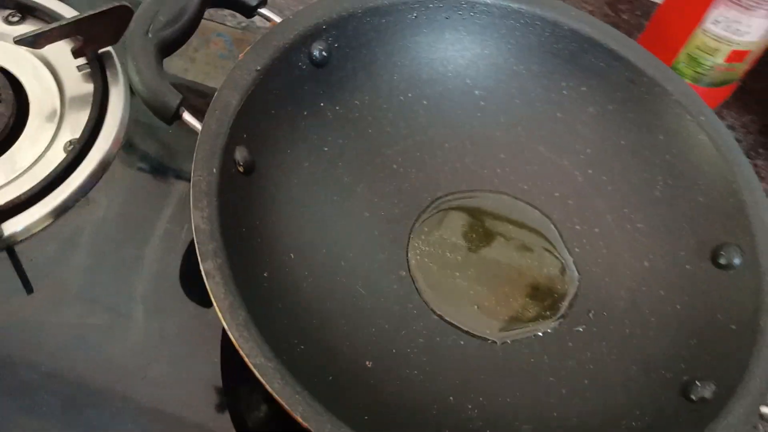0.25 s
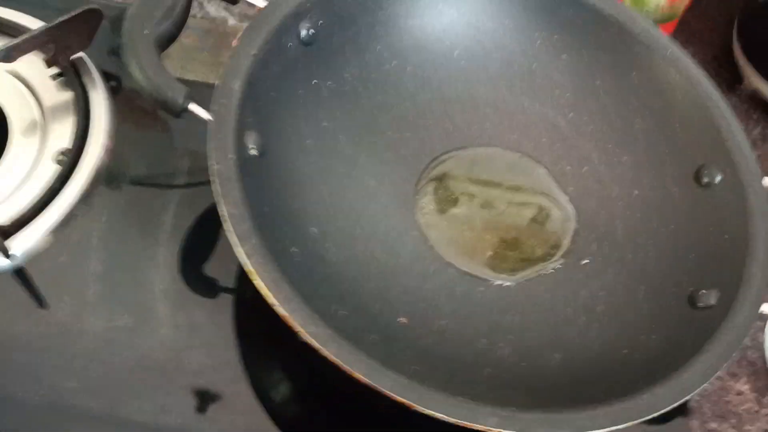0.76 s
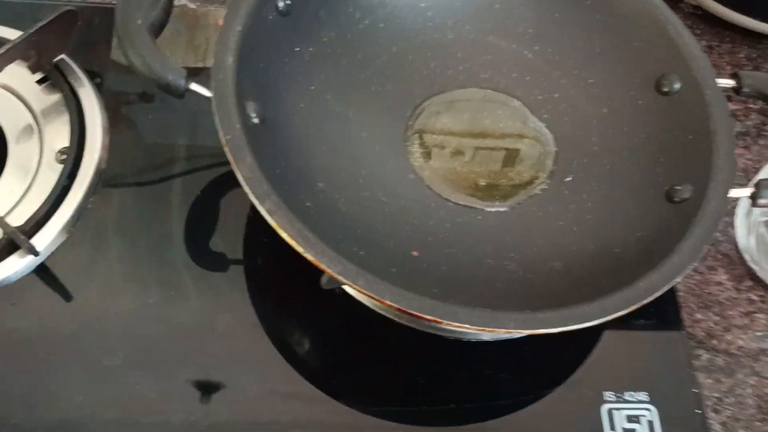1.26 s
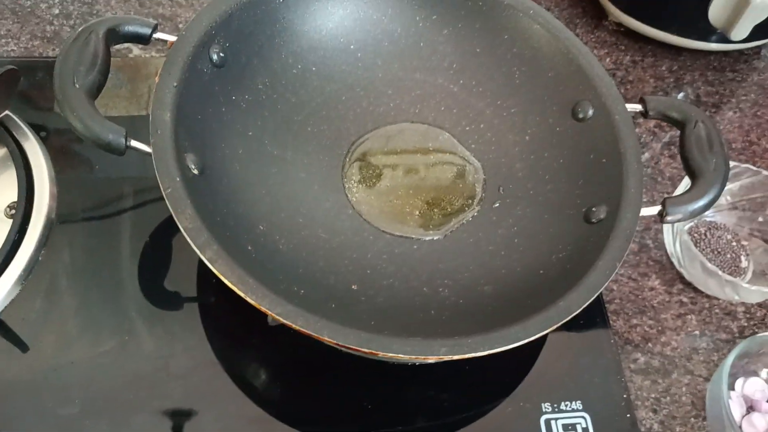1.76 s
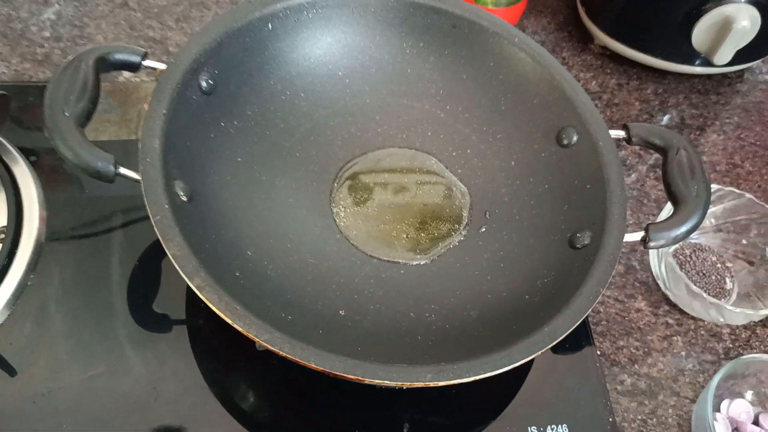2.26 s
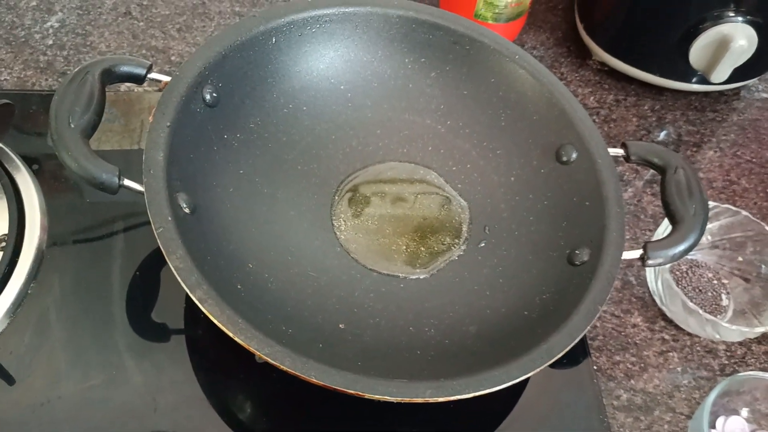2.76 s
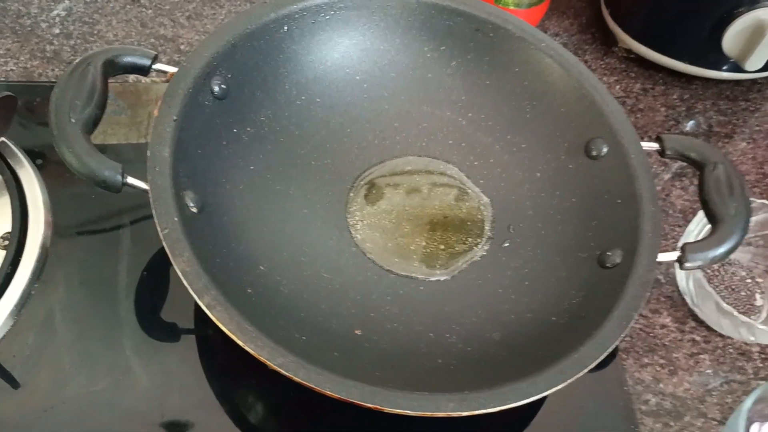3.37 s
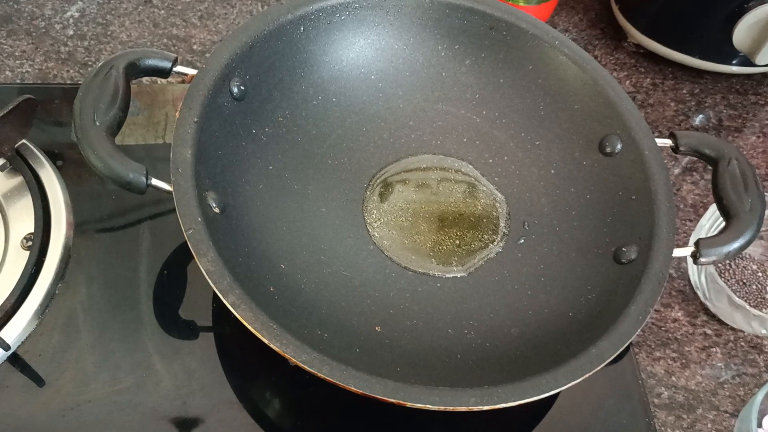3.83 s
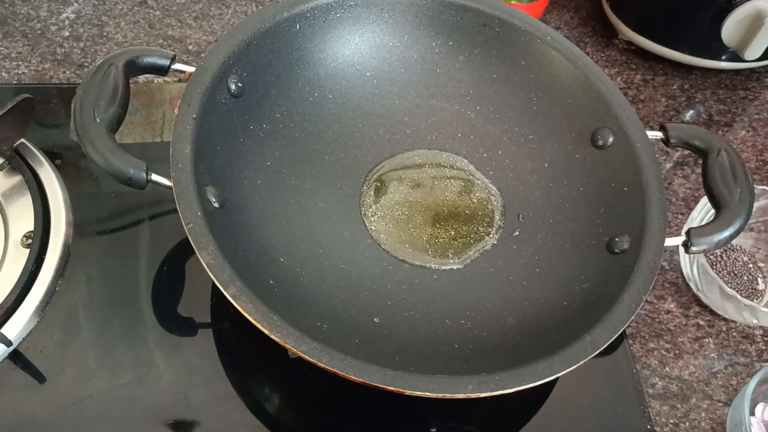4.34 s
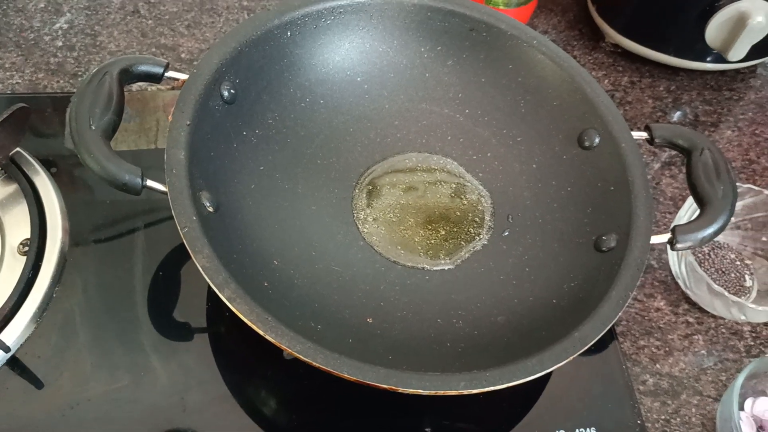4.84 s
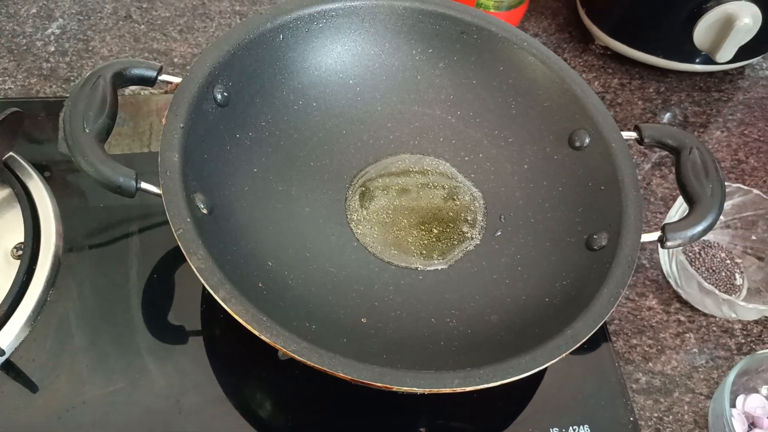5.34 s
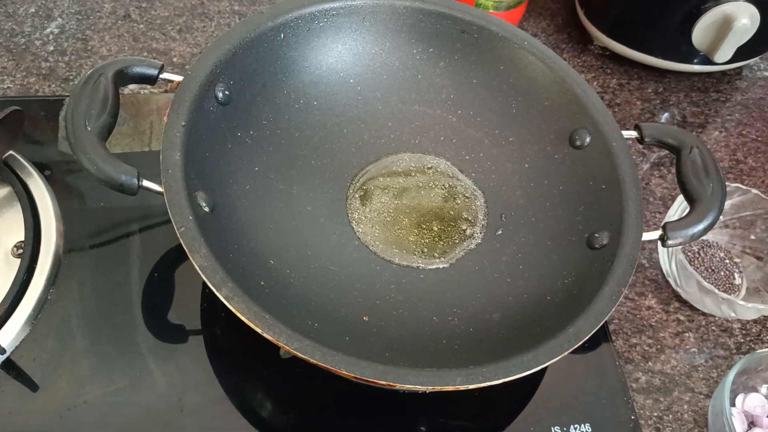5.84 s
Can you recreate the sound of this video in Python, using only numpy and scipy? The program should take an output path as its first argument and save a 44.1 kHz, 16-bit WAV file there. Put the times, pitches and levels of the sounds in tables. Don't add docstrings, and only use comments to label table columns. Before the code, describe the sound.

Close to a pan of heating oil, small bright pops and clicks burst irregularly over a soft steady gas hiss. Around half a second a hand rubs the phone with a knock and low thud. Pops stay sparse for a while, then thicken after four seconds into busy crackling, with louder bursts near the end. A small kitchen adds short echoes, and faint horns sound far away.

```python
import sys
import numpy as np
from scipy import signal
from scipy.fft import rfft, irfft, next_fast_len
from scipy.io import wavfile
from scipy.ndimage import uniform_filter1d, minimum_filter1d, map_coordinates

SR = 44100
rng = np.random.default_rng(int(sys.argv[2]) if len(sys.argv) > 2 else 0)


def persist_wave(psi):
    counts = np.round(np.clip(psi, -1, 1) * 32767).astype(np.int16)
    wavfile.write(sys.argv[1], SR, np.atleast_2d(counts).T)


def rack_gain(trim_db):
    fader = np.asarray(trim_db, float)
    return 10 ** (fader / 20)


N = 269010

# frequency in Hz, left-right likeness from -1 to 1.
LIKENESS = [(60, 0.67), (180, 0.77), (550, 0.59), (1650, -0.54), (4970, 0.3), (15000, 0.22)]


def unit(x):
    return x / np.sqrt(np.mean(x ** 2) + 1e-20)


def along(points, hz):
    f, v = np.transpose(points)
    return np.interp(np.log(hz + 1), np.log(f + 1), v)


def wobble(rate):
    knots = rng.standard_normal(int(N * rate / SR) + 4)
    return map_coordinates(knots, [np.arange(N) * rate / SR])


def filtered(x, response):
    m = next_fast_len(N + SR // 2)
    return irfft(rfft(x, m) * response(np.fft.rfftfreq(m, 1 / SR)), m)[..., :N]


def causal(points, size=1024):
    cepstrum = irfft(np.log(rack_gain(along(points, np.fft.rfftfreq(size, 1 / SR))) + 1e-6))
    fold = np.r_[1, 2 * np.ones(size // 2 - 1), 1, np.zeros(size // 2 - 1)]
    return irfft(np.exp(rfft(cepstrum * fold)))


def rush(spectrum, alike, patchy_db):
    z = signal.stft(rng.standard_normal((2, N)), nperseg=512)[2]
    field = uniform_filter1d(rng.standard_normal(z.shape[1:]), size=6, axis=0)
    field = uniform_filter1d(field, size=12, axis=1)
    pair = signal.istft(z * rack_gain(patchy_db * unit(field)), nperseg=512)[1][:, :N]

    def response(hz):
        angle = np.arccos(np.clip(along(alike, hz), -1, 1)) / 2
        return rack_gain(along(spectrum, hz)) * [np.cos(angle), np.sin(angle)]

    mid, side = filtered(pair, response)
    return unit(np.array([mid + side, mid - side]))


def flame():
    # time in seconds, level in dB.
    jet = [(0, -51.5), (2.5, -52), (4.1, -50), (6.1, -54)]
    # frequency in Hz, density in dB per Hz.
    hiss = [(530, -60), (900, -15), (1120, -11.5), (1160, -10.5), (1460, -12.5), (1900, -5), (2020, -6),
            (4360, -2.5), (5960, -10.5), (15100, -39), (16000, -27)]
    hiss_db = np.interp(np.arange(N) / SR, *np.transpose(jet))
    return rack_gain(hiss_db - 11.0 + 1.3 * wobble(4.22)) * rush(hiss, LIKENESS, patchy_db=2.0)


def house():
    # frequency in Hz, density in dB per Hz.
    murmur = [(12, -15), (36, -2), (60, -8.5), (140, -9), (176, -14.5), (213, -15.5), (322, -13.5),
              (750, -18), (860, -19.5), (1600, -17.5), (3000, -100)]
    # start in seconds, length in seconds, pitch in Hz, level in dB.
    horns = [
        (2.46, 0.097, 729, -76),
        (2.577, 0.29, 1496, -77),
        (3.435, 0.18, 721, -76.5),
        (3.581, 0.16, 1396, -77),
        (4.23, 0.18, 1200, -76),
    ]
    t = np.arange(N) / SR
    tones = np.zeros(N)
    for start, length, hz, db in horns:
        swell = np.sin(np.pi * np.clip((t - start) / length, 0, 1)) ** .6
        tones += rack_gain(db + 3.5) * swell * np.sin(2 * np.pi * hz * t + 1.5 * wobble(30))
    return rack_gain(-67.5) * rush(murmur, LIKENESS, patchy_db=1.0) + tones


def ringing(hz, cycles, rise, t):
    swell = 1 - np.exp(-t * hz / rise)
    decay = rack_gain(-60 * (t * hz / cycles) ** 2.02)
    ring = swell * decay * np.sin(2 * np.pi * hz * t * (1 + 12 * t))
    return ring / np.abs(ring).max(axis=1, keepdims=True)


def patter(s, length, db, hz, count, octaves):
    draw = rng.random((count, 4))
    start = s + length * draw[:, 0]
    size_db = db + np.minimum(-4 * np.log(draw[:, 1]), 6.5)
    hz = hz * 2 ** (octaves * (draw[:, 2] - .5))
    snap_db = size_db - 20 - 14 * draw[:, 3]
    return np.c_[start, size_db, hz, size_db - 8, 1.5 * hz, snap_db]


def pops():
    # start in seconds, cavity level in dB, cavity pitch in Hz, neck level in dB, neck pitch in Hz.
    deep = [(0.9554, -30.0, 2900, -32.5, 3660.0), (1.3148, -31, 3700, -56, 4900),
            (1.4058, -25, 3460, -32.0, 4800), (1.5851, -33, 3170, -44.5, 2350.0),
            (1.6067, -35.5, 2770, -41, 3900.0), (1.7974, -33.5, 2760, -35.5, 3620),
            (1.9113, -41, 2800, -47, 5250), (2.8601, -30.5, 2510, -44, 3600.0),
            (3.1626, -37, 2650, -36, 5200), (3.285, -34, 4220.0, -47, 2450.0),
            (3.5164, -26, 3850, -32, 2780), (3.6941, -30.5, 3800, -43.5, 2800),
            (3.8485, -33.5, 3000, -36.0, 3800), (3.9964, -42, 2340, -42, 3500),
            (4.1679, -35, 3000, -48, 4760.0), (4.2923, -27.0, 3740, -30.5, 5170),
            (4.3802, -22.5, 2395, -25, 3690.0), (4.5268, -32, 2690, -45, 3740.0),
            (4.5421, -34, 4660, -45, 2600), (4.6805, -32, 2310, -38.5, 3070.0),
            (4.775, -37, 3250.0, -46, 4670), (4.8802, -26.5, 2740, -41, 4000),
            (4.9289, -38, 4850.0, -44.0, 2900), (4.9454, -32.5, 2940.0, -33.5, 2330),
            (5.0351, -29.5, 2760, -36.5, 4580), (5.1641, -24.5, 4560, -30.5, 2800),
            (5.1852, -27.5, 2710.0, -44, 3760.0), (5.4597, -27.5, 2590, -38, 3800.0),
            (5.5377, -26, 2274, -37.0, 3520), (5.617, -37, 2600, -49, 3810.0),
            (5.6578, -36.0, 2210.0, -46, 3010.0), (5.6974, -18, 3280, -34, 5770),
            (5.709, -32, 3120, -39, 4730.0), (5.7542, -29, 2580, -41, 4200.0),
            (5.9111, -34.0, 2150, -38.5, 3070), (6.0251, -25.5, 2640, -43, 1970.0)]
    plain = [(0.2159, -30, 5940, -35, 3230), (0.2423, -29, 5510.0, -35, 3360.0),
             (0.2611, -34.0, 3650, -43.5, 2910), (0.3235, -36.5, 3300, -44, 5130.0),
             (0.3457, -33, 3200, -47, 5160.0), (0.3568, -40, 3150, -47.0, 4010.0),
             (0.5977, -33.5, 4180, -43.5, 2720.0), (1.4292, -36, 4070.0, -37.5, 3100),
             (1.6497, -33, 2830, -35.5, 3770.0), (1.961, -35, 4050, -36.5, 3250.0),
             (2.136, -42, 4200, -48.0, 3050), (2.6895, -31, 5050, -38, 3830.0),
             (2.7552, -34.5, 3840, -45.5, 2650.0), (2.78, -29, 4640, -44, 3760.0),
             (3.169, -28.5, 4250, -37.5, 5570), (3.2202, -31.5, 5270, -42, 3840.0),
             (3.4795, -30.5, 3930, -32.5, 2950), (3.5735, -41, 2730.0, -44, 3470.0),
             (3.7956, -33.5, 2900, -51, 3880.0), (4.1263, -26, 3360, -35.0, 2690),
             (4.1837, -36, 3800, -38.5, 5060.0), (4.4274, -30, 5210.0, -40, 3830.0),
             (4.5609, -28, 5100, -34, 4170), (4.6909, -30, 4800, -37, 3230.0),
             (4.7236, -42, 5430.0, -47, 3710.0), (4.7432, -39, 2310, -38.5, 3150.0),
             (4.7818, -43.5, 2740.0, -47.0, 4740.0), (4.9346, -36, 3150.0, -40, 4770),
             (4.9882, -29.0, 2840.0, -33.5, 3900), (5.1592, -36.5, 5170.0, -47.0, 3880.0),
             (5.389, -33.5, 2190, -38.5, 2770.0), (5.4667, -27.0, 4700, -35.5, 2800),
             (5.6032, -33.5, 2640, -36, 3800.0), (5.7751, -42, 3720.0, -53, 2860.0),
             (6.0636, -25.5, 2740, -38, 1990.0)]
    shallow = [(0.036, -33.5, 5380.0, -43, 3600), (0.0579, -35, 3570.0, -46, 4660.0),
               (0.4928, -35, 3280.0, -40, 2420), (1.0121, -36.5, 2900, -42, 5200),
               (1.3515, -32.5, 2900, -36, 3540), (1.9448, -37, 2800, -36.5, 5100),
               (2.0508, -38, 4190.0, -39, 5600), (2.1881, -32.5, 4020, -36, 5900),
               (2.8399, -29.0, 4800, -36.5, 3230), (2.9054, -39.5, 3300, -48, 2520),
               (3.0254, -31, 3600, -38, 6000), (3.098, -34.5, 4290.0, -40, 2700.0),
               (3.3638, -42, 2800, -56, 1990.0), (3.737, -33, 3880.0, -42, 2860),
               (4.0209, -41.0, 2370, -43, 3390.0), (4.0656, -44.5, 2330, -44.5, 2930.0),
               (4.3653, -23.5, 4100, -33, 2760), (4.4156, -36, 3000.0, -41, 3810.0),
               (4.4708, -30, 5400, -40, 4400), (4.5546, -31.5, 5520.0, -40, 3940.0),
               (4.5914, -33.5, 5970, -37.5, 3960), (4.6007, -35, 4720.0, -43, 2660.0),
               (4.6477, -35, 2930.0, -36, 5560), (4.6757, -36, 5200, -48, 2230),
               (4.7024, -39, 2910.0, -44.0, 3850.0), (4.7103, -41.0, 5150.0, -50, 4070.0),
               (4.7285, -39, 3880.0, -40, 4850.0), (4.855, -40.5, 4700, -42, 3270.0),
               (5.5097, -40, 3080.0, -43.0, 4800), (5.6828, -28, 3010.0, -33.0, 3850),
               (5.741, -38, 2120.0, -42, 3120.0), (5.7685, -36, 4960.0, -36, 3020.0),
               (5.7825, -44, 2450, -45.0, 3370.0), (5.8096, -33, 5340, -41.5, 2780.0),
               (5.8696, -30.5, 2930, -34, 3730), (5.9709, -34, 3770.0, -47, 3040),
               (5.9933, -35, 3750, -43, 3060)]
    # start in seconds, cavity level in dB, cavity pitch in Hz.
    pure = [
        (.0767, -21, 2874),
        (2.3029, -29.5, 2700),
        (2.3116, -24.5, 2860),
    ]
    tiny = [(0.0705, -52, 3630.0), (0.1021, -48, 2870.0), (0.2104, -41, 6100.0), (0.2808, -44, 3190.0),
            (0.3681, -48.0, 2860.0), (0.373, -43, 3160), (0.3893, -42, 3530.0), (0.406, -50, 3090.0),
            (0.4214, -48, 3460.0), (0.4311, -39, 4350), (0.4487, -49, 3540.0), (0.8202, -54, 3220.0),
            (1.2079, -41, 5200), (1.2196, -40, 5200), (1.5813, -46, 3800.0), (1.8333, -50.0, 3210.0),
            (2.222, -41, 4360), (2.2372, -44.5, 3770.0), (2.6523, -44.5, 4220.0), (2.6676, -47.5, 2660),
            (2.7154, -44, 2850), (2.8192, -43, 3850.0), (2.8817, -45, 2620), (3.0358, -46.0, 4100),
            (3.2168, -44, 2670.0), (3.3179, -49, 2780.0), (3.3282, -47, 2680.0), (3.3823, -44.0, 4170),
            (3.5444, -42.0, 2500), (3.5696, -47, 2430.0), (3.6265, -47, 2490.0), (3.6758, -45.0, 3460.0),
            (4.0451, -50.0, 2350.0), (4.1049, -49.0, 2310.0), (4.28, -49, 3930), (4.4112, -44.0, 3700.0),
            (4.6126, -48.0, 3460.0), (5.1388, -46.0, 3820), (5.3522, -47, 5210.0), (5.7284, -47, 3500),
            (5.8429, -43, 4730.0)]
    drops = [(.5075, -41, 3250), (1.8095, -41.5, 5120), (1.9755, -46, 4030), (3.0762, -50, 2840),
             (3.4929, -51, 4330), (3.5277, -43, 3930), (4.3775, -45, 2390), (5.3706, -45.5, 3300),
             (5.6888, -47, 2800), (5.6938, -35, 2270), (5.7224, -42, 3120)]
    # start in seconds, cavity level in dB, cavity pitch in Hz, snap in dB.
    spits = [(0.1137, -46, 2960, -50), (0.1732, -41.5, 3420, -44.5), (0.297, -32.5, 7940, -46),
             (1.0378, -33.5, 4840, -50.5), (1.258, -72, 5400, -50), (1.8816, -59, 4100, -47.5),
             (2.0588, -45, 4430, -40), (2.117, -29, 4330, -40.5), (2.1543, -58, 4310, -47),
             (2.734, -33.5, 3960, -45), (2.9388, -42, 8450, -51), (3.058, -45, 2560, -49),
             (3.3663, -38, 2930, -49), (3.7544, -32.5, 3800, -40), (3.7671, -34, 2270, -40),
             (3.954, -63, 3220, -50), (4.0704, -69, 4160, -40), (4.582, -45, 4820, -45),
             (.668, -45, 4520, -45), (4.9146, -30, 4870, -45.5), (5.072, -51, 2670, -48),
             (5.1, -35, 3960, -40), (5.258, -28.5, 4030, -40.5), (5.372, -58, 3270, -54),
             (5.861, -44, 3680, -46.5), (6.0917, -30, 3070, -37.5)]
    rows = []
    for table, snap_db in [(deep, 28.2), (plain, 26), (shallow, 17)]:
        table = np.array(table)
        snap = np.minimum(table[:, 1] - snap_db, -40)
        rows.append(np.c_[table, snap])
    for table, neck_db, ratio, snap_db in [(pure, 22.4, 1.79, 62), (tiny, 7, 1.37, 23), (drops, 7.4, 1.44, 31)]:
        s, db, hz = np.transpose(table)
        neck_hz = np.where(hz > 4496, hz / ratio, hz * ratio)
        rows.append(np.c_[s, db, hz, db - neck_db, neck_hz, db - snap_db])
    s, db, hz, snap_db = np.transpose(spits)
    neck_hz = 5770 * np.exp(0.1 * rng.standard_normal(len(s)))
    rows.append(np.c_[s, db, hz, snap_db + 3, neck_hz, snap_db])
    return np.vstack(rows)


def bubbles(s, db, hz, neck_db, neck_hz, snap_db):
    # frequency in Hz, level in dB.
    splash = [(500, -36), (2500, 4.5), (5000, 15), (8500, 9), (11000, -20), (15000, -33)]
    spark = [(600, -25), (1600, -4), (4000, 4), (7000, 10), (10000, -2), (16000, -13.5)]
    # delay in seconds, level in dB.
    bowl = [(.0007, -5), (.0013, -5), (.0022, -7), (.0036, -12), (.0056, -17), (.0105, -16), (.0135, -19)]
    t = np.arange(320) / SR
    s, db, hz, neck_db, neck_hz, snap_db = (v[:, None] for v in (s, db, hz, neck_db, neck_hz, snap_db))
    depth = np.clip((db - snap_db - 19.5) / 30, 0, 1)
    cavity = rack_gain(db) * ringing(hz, 9 + 4 * depth, 0.29 + 5 * depth, t)
    neck = rack_gain(neck_db + 1.5) * ringing(neck_hz, 8.4 + 6 * depth, 1.0 + 3 * depth, t)

    chance = rng.random((len(s), 2))
    rim_db = (db + neck_db) / 2 - 13 + 8 - 9.7 * chance[:, :1]
    rim_hz = np.minimum(hz * 2 ** (0.28 + 0.98 * chance[:, 1:]), 6820)
    neck = neck + rack_gain(rim_db) * ringing(rim_hz, 21, 4.5, t)
    tones = cavity + neck

    snap = rng.standard_normal((len(s), len(t))) * rack_gain(-60 * t / .0009)
    snap[:, :1] += 3
    spit = db - snap_db < 15.5
    colour = np.where(spit, causal(spark)[:200], causal(splash)[:200])
    snap = signal.fftconvolve(snap, colour, axes=1)[:, :len(t)]
    snap = rack_gain(snap_db + 9.0) * snap / np.abs(snap).max(axis=1, keepdims=True)
    burst = tones + snap

    at = np.round((s - .0002) * SR).astype(int) + np.arange(len(t))

    def place(sound, shift=0):
        return np.bincount((at + shift).ravel(), sound.ravel(), N + SR)[:N]

    direct = place(burst)
    upward = place(cavity + 1.52 * neck + 0.28 * snap)
    out = np.array([np.pad(direct, (1, 0))[:N], direct])
    returned = np.where(spit, .4, 1) * (0.62 * tones + 0.4 * burst)
    draw = rng.random((len(s), len(bowl), 3))
    for k, (delay, echo_db) in enumerate(bowl):
        for port in range(2):
            weak = draw[:, k, port, None]
            late = draw[:, k, 2:] + .3 * weak
            shift = (delay * SR * (1 + 0.2 * late)).astype(int)
            out[port] += place(rack_gain(echo_db - 9.6 * weak) * returned, shift)
    return upward, out


def kitchen(x):
    # frequency in Hz, 60 dB decay time in seconds.
    decay = [(1000, 0.87), (3000, 0.36), (6000, 0.39), (12000, 0.82)]
    out = np.zeros((2, N + 2 * SR))
    step = SR // 3
    for start in range(0, N, step):
        hz, t, z = signal.stft(rng.standard_normal((2, SR // 2)), SR, nperseg=256)
        tail = signal.istft(z * rack_gain(-60 * t / along(decay, hz)[:, None]), SR, nperseg=256)[1]
        tail = tail / np.linalg.norm(tail[0])
        wet = signal.fftconvolve(x[None, start:start + step], tail, axes=1)
        out[:, start + 150:][:, :wet.shape[1]] += wet
    return out[:, :N]


def oil():
    # start in seconds, length in seconds, level in dB, middle pitch in Hz.
    fizz = [
        (0.485, 0.037, -59, 3050),
        (1.2, 0.027, -51.5, 4300),
        (2.647, 0.082, -54, 2720),
        (4.68, 0.041, -51, 4170),
        (5.698, 0.089, -56, 3250),
    ]
    distinct = pops()
    swarms = [patter(*swarm, count=10, octaves=0.35) for swarm in fizz]
    tiny = patter(0, 0.94, -57, 3660, count=210, octaves=0.75)
    parent = (tiny[:, 0] * len(distinct)).astype(int)
    wait = rng.exponential(.06, len(tiny))
    tiny[:, 0] = np.minimum(distinct[parent, 0] + wait, N / SR)
    upward, near = bubbles(*np.vstack([distinct, tiny, *swarms]).T)
    return near + rack_gain(-8.0) * kitchen(upward)


def hand():
    # frequency in Hz, density in dB per Hz.
    skin = [(180, -26), (300, -9.5), (1500, -8.5), (3700, 4), (5500, -3), (7200, -10), (9000, -20),
            (16000, -29)]
    thud = [(12, -8), (45, -1.5), (135, -6.5), (178, -1), (230, -25), (330, -15.5), (1200, -33),
            (2500, -57)]
    # start in seconds, level in dB, pitch in Hz, 60 dB decay in seconds, left over right.
    jolts = [
        (0.488, -50, 111, 0.036, 0.74),
        (0.505, -36.5, 330, 0.018, 1),
        (0.573, -34.5, 55.3, 0.084, .1),
        (.607, -46, 21.2, 0.53, 0.23),
    ]
    touch_s, grab_s, lift_s, gone_s = .3, .479, .72, 1.0
    creep_db, slide_db, sag_db_per_s, lift_db_per_s = -54.5, -47, 7, 96
    shock_db, settle_db_per_s, squeeze_db, lean_db = -46.5, 150, -69, -1
    t = np.arange(N) / SR
    touch = np.clip((t - touch_s) / 0.013, 0, 1) * np.clip((gone_s - t) / 0.053, 0, 1)
    grab = np.clip((t - grab_s) / .014 + .3, 0, 1)
    held = np.maximum(t - grab_s, 0)

    rub_db = creep_db + (slide_db - creep_db) * grab - sag_db_per_s * held
    rub_db = rub_db - lift_db_per_s * np.maximum(t - lift_s, 0)
    rub = rack_gain(rub_db + 2.6 * wobble(39.5)) * rush(skin, [(400, 1.0), (1400, .02)], patchy_db=1.5)

    shake = grab * rack_gain(shock_db - settle_db_per_s * held) + rack_gain(squeeze_db)
    lumps = rack_gain(2.5 * np.array([wobble(30), wobble(30)]))
    body = unit(lumps * rush(thud, [(50, 1.0), (200, 0.9)], patchy_db=3.0))
    rumble = touch * shake * rack_gain([[lean_db / 2], [-lean_db / 2]]) * body
    for s, db, hz, t60, left in jolts:
        since = np.maximum(t - s, 0)
        rumble -= np.c_[[left, 1]] * rack_gain(db - 60 * since / t60) * np.sin(2 * np.pi * hz * since)
    return touch * rub * rack_gain([[-1.5], [1.5]]), rumble


def scene():
    # frequency in Hz, left over right in dB.
    tilt = [(60, 0.5), (100, 3), (180, 0), (310, 0.5), (550, 2), (950, 0), (1650, 6), (2860, 14), (4970, 9),
            (8640, -3), (15000, 1.5)]
    rub, rumble = hand()
    air = oil() + flame() + house() + rub
    hz, tilt_db = np.transpose(tilt)
    right_db = 20 * np.log10(2 / (1 + rack_gain(tilt_db)))
    ports = np.array([causal(np.c_[hz, right_db + tilt_db]), causal(np.c_[hz, right_db])])
    return signal.fftconvolve(air, ports, axes=1)[:, :N] + rumble


def thinned(x):
    hz, t, z = signal.stft(x, SR, nperseg=256)
    body = uniform_filter1d(np.sum(np.abs(z[:, 12:36]) ** 2, axis=(0, 1)), size=2)
    loudest = -minimum_filter1d(-body, size=11)
    attack = loudest > rack_gain(2 * 13) * minimum_filter1d(body, size=11)
    cells = uniform_filter1d(np.abs(z.sum(axis=0)), size=4, axis=0)
    faint = cells < 1.15 * np.median(cells, axis=1, keepdims=True)
    gain = np.where(attack & (hz[:, None] > 7800), 1.15 * ~faint, 1)
    return signal.istft(z * gain, SR, nperseg=256)[1][:, :N]


def roll_off(x):
    return signal.sosfilt(signal.butter(12, 16620, fs=SR, output="sos"), x)


def record(dry):
    # frequency in Hz, level in dB.
    edge = [(15700, 0), (15900, -16), (16500, -20), (16700, -80)]
    wired = dry + rack_gain(-74.5) * rng.standard_normal(dry.shape)
    limited = filtered(wired, lambda hz: rack_gain(along(edge, hz)))
    mix = thinned(limited) - .0004
    return roll_off(mix)


dry = scene()
out = record(dry)
persist_wave(out)
```